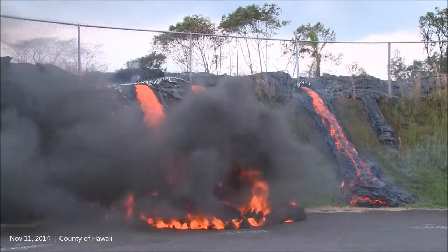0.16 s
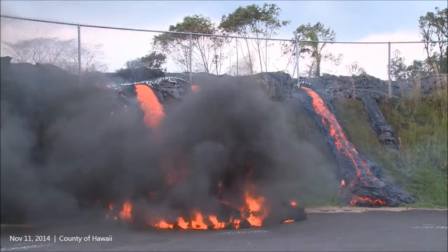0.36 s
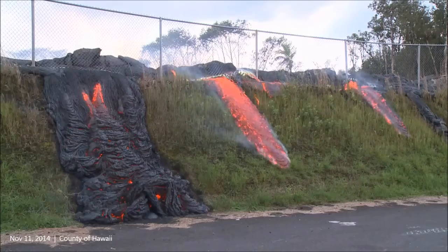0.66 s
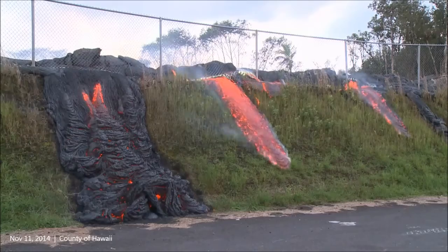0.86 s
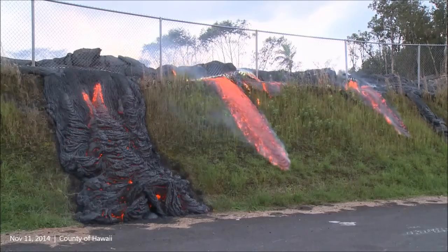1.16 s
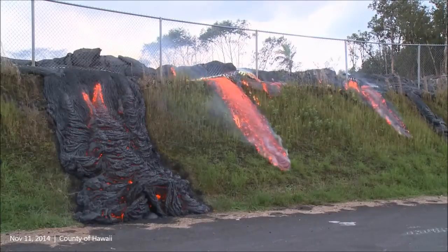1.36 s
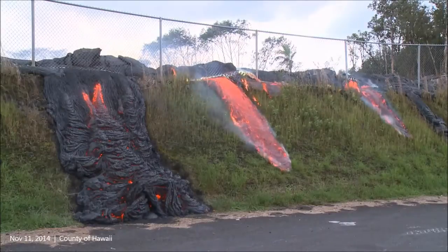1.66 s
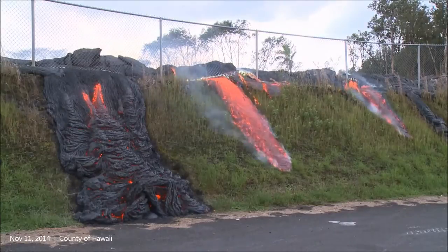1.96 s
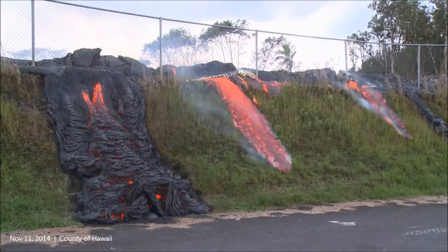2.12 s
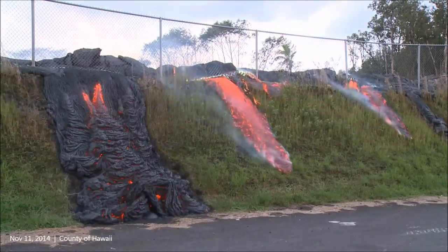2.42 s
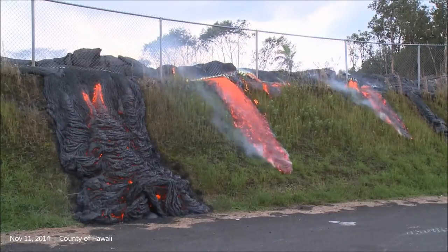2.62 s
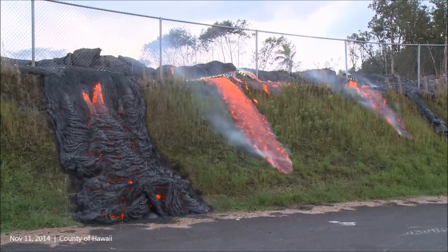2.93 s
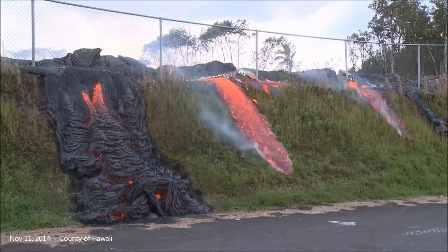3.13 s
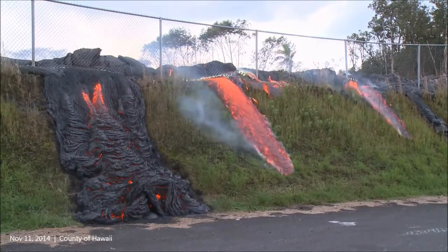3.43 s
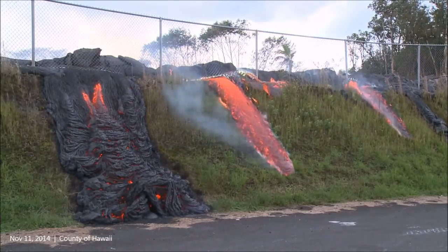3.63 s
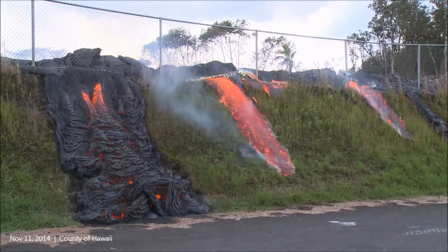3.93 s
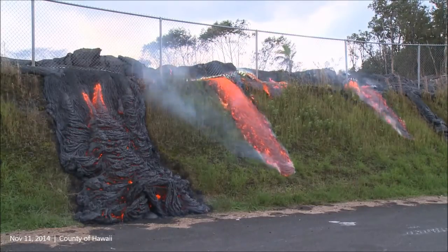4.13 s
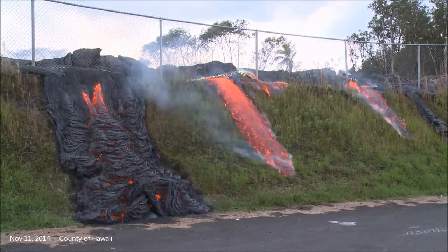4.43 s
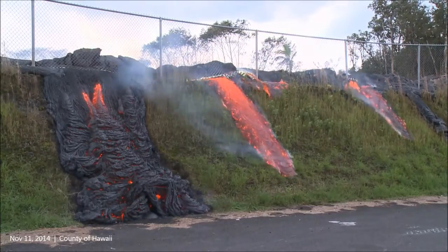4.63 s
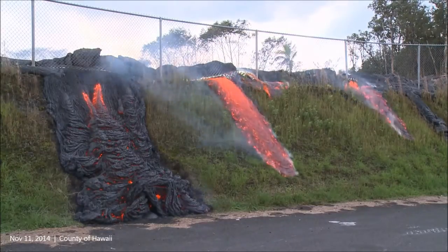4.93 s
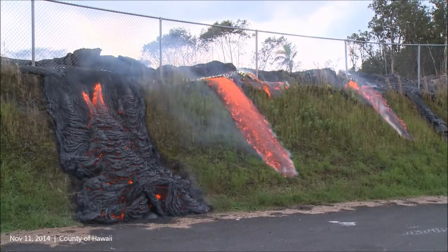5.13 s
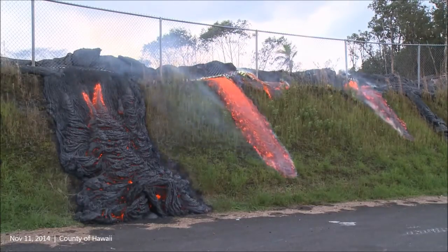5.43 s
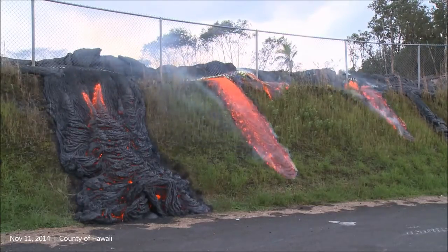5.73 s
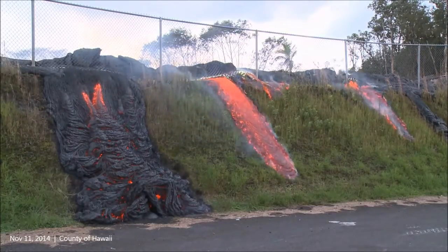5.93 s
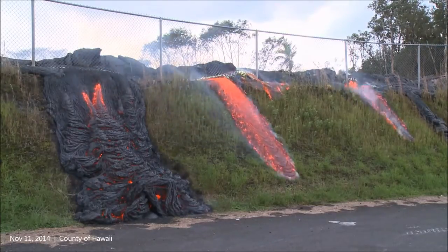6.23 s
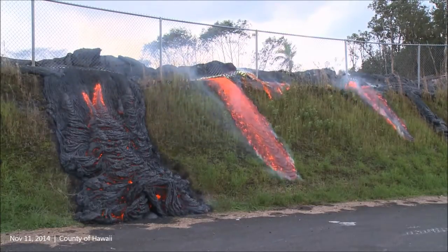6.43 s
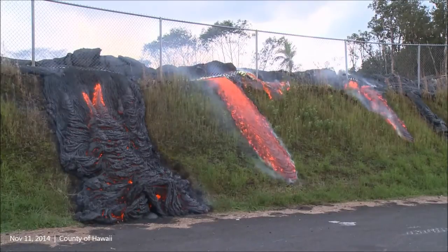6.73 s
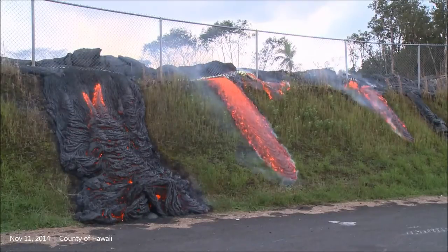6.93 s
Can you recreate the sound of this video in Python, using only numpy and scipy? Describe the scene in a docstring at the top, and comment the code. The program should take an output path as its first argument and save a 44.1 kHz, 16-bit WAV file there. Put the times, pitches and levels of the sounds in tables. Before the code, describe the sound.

Outdoors, a brief spatter of flaming asphalt breaks off in a tiny silence, giving way to grass burning under lava. Fine crackling and sizzling gently swell and ease while stalks snap and steam pockets pop at uneven intervals, two of them much louder. Later the crust settles with one dull thud. A faint rumble and a light breeze on the microphone lie underneath.

```python
"""Lava burning asphalt and grass

Half a second of flaming asphalt, a brief silence, then lava creeping down a grassy bank.
Steam pockets burst as short blasts, stalks snap, and countless tiny bursts merge into frying.
The ground doubles each pop, the bank returns a faint echo, and light wind rumbles on the microphone."""
import sys
import numpy as np
from scipy import signal
from scipy.fft import rfft, irfft
from scipy.io import wavfile
from scipy.ndimage import uniform_filter1d

SR = 44100
rng = np.random.default_rng(int(sys.argv[2]) if len(sys.argv) > 2 else 0)


def master(y):
    """Save y as 16-bit WAV."""
    cut = np.clip(np.atleast_2d(y).T, -1, 1)
    pcm = np.round(cut * 32767)  # scale
    wavfile.write(sys.argv[1], SR, pcm.astype(np.int16))


N = 311787
TIME_S = np.arange(N) / SR
ASPHALT_END_S, BANK_START_S = 0.505, 0.6055

# hiss of boiling sap and fine grit: freq_hz, density_db
SIZZLE_SPECTRUM = [(1500, 3), (3000, -25), (4500, 11), (7000, -6.5), (11000, -5.5), (16000, 5)]


def loud_pops():
    """Bursts of steam and stalks that stand out of the crackle; large pockets are low."""
    # start_s, blast_db, pitch_hz, snap_db
    events = [(0.0467, -48, 935, -52), (.129, -50, 1530, -58), (0.1843, -45, 1200, -81),
              (0.2482, -45.5, 480, -76), (.3309, -49.5, 2510, -43.5), (.607, -45.5, 1000, -53.5),
              (.6741, -49.5, 1030, -51.5), (0.822, -57, 1110, -45.5), (0.928, -45.5, 590, -48),
              (1.0078, -40, 1110, -73), (1.0477, -56, 1510, -43), (1.1347, -31.5, 1820, -46),
              (1.19, -53, 2820, -37), (1.2393, -49, 1940, -46), (1.2591, -47, 1610, -53),
              (1.2718, -43.5, 2730, -46), (1.3604, -49.5, 2340, -49.5), (1.4121, -50.5, 1520, -49.5),
              (1.6108, -23.5, 2270, -25.5), (1.628, -44.5, 2340, -50), (1.7386, -50, 1970, -42.5),
              (1.7901, -37, 2120, -44.5), (1.8527, -42.5, 646, -65), (1.979, -53, 2350, -48.5),
              (2.031, -47.5, 1150, -75), (2.1545, -55, 1940, -49), (2.161, -52, 2300, -49),
              (2.2824, -68, 1710, -45.5), (2.3082, -47.5, 1710, -53), (2.3283, -37, 2040, -42.5),
              (2.461, -47.5, 430, -69), (2.7121, -71, 1940, -52), (2.7396, -43, 560, -60),
              (2.7667, -49.5, 810, -59), (2.9137, -47.5, 1950, -52), (2.9387, -49.5, 710, -72),
              (3.1755, -33, 690, -67), (3.1882, -38.5, 890, -56), (3.2644, -71, 1420, -47.5),
              (3.3006, -59.5, 1100, -50), (3.5507, -50, 1410, -47), (3.597, -25.5, 1060, -38.5),
              (3.6287, -45.5, 1710, -65), (3.7215, -63, 2200, -50), (3.7805, -46.5, 1510, -51),
              (3.8068, -45, 2200, -35.5), (3.8323, -47, 2500, -40), (3.8356, -35, 2640, -45),
              (4.1269, -60, 2000, -44.5), (4.134, -49, 2650, -44), (4.2568, -67, 1710, -48.5),
              (4.3376, -46.5, 1310, -49), (4.388, -47, 2870, -34.5), (4.473, -61, 2200, -49),
              (4.4974, -47.5, 1260, -42.5), (4.5888, -41, 1360, -71), (4.667, -35, 760, -78),
              (4.7821, -42, 1880, -50), (4.9104, -48, 3010, -45.5), (4.9474, -47, 1940, -45),
              (4.9633, -47, 1950, -46), (4.979, -40.5, 2000, -39.5), (5.003, -47, 2070, -48),
              (5.0305, -50, 1180, -46), (5.0605, -67, 810, -43.5), (5.1104, -47.5, 2400, -49),
              (5.118, -53, 1180, -67), (5.2243, -63, 410, -47), (5.6648, -42.5, 1630, -38.5),
              (5.7129, -40.5, 1690, -40.5), (5.8041, -50.5, 2360, -55), (5.8364, -47.5, 1080, -58),
              (5.9002, -61, 2300, -48), (6.1124, -48, 1710, -56), (6.2425, -45.5, 420, -100),
              (6.329, -48, 2340, -59), (6.443, -48.5, 2070, -59), (6.7178, -45, 1140, -77),
              (6.8684, -50, 590, -73), (6.912, -47.5, 2430, -50), (7.016, -46.5, 1020, -69)]
    out = np.zeros(N)
    for start_s, blast_db, pitch_hz, snap_db in events:
        add(out, start_s, pop(blast_db, pitch_hz, snap_db))
    return out


def small_pops(blast_db=-55, snap_db=-57.5, blast_range_db=4, snap_range_db=7,
               low_hz=600, high_hz=2700, follow=0.99, count=110):
    """Weaker bursts at uneven intervals, mostly from small, high pockets, grow with the fire."""
    out = np.zeros(N)
    for k, (delay, size, strength, sharpness) in enumerate(rng.random((count, 4))):
        start_s = (k + 2 * delay) / count * N / SR
        pitch_hz = high_hz * (low_hz / high_hz) ** (size ** 2)
        fire_db = follow * burn_db(start_s)
        body_db = blast_db + fire_db + blast_range_db * (2 * strength - 1)
        front_db = snap_db + fire_db + snap_range_db * (2 * sharpness - 1)
        add(out, start_s, pop(body_db, pitch_hz, front_db))
    return out


def pop(blast_db, pitch_hz, snap_db, mirror_hz=1700, snap_hz=4400, top_hz=13000, dull_db=-33):
    """A blast with a snap on its front; heavy snaps are duller."""
    bounce = 0.85 / (1 + (pitch_hz / mirror_hz) ** 2 / 2)  # long waves mirror best: low pops ring hollow
    body = ground(burst(pitch_hz), bounce=bounce, scatter=0.3, linger=0.22)
    click = snap(snap_hz, top_hz / (1 + amp(snap_db - dull_db)))
    front = ground(click, bounce=0.81, scatter=1.0, linger=0.46)
    return amp(blast_db) * body + amp(snap_db) * front


def burst(pitch_hz, tight_hz=2300, ring_hz=2050, puff_hz=220):
    """Small pockets ring longer, large ones push a puff of air; a faint fixed ring adds a woody bite."""
    pulse = unit(blast(pitch_hz, q=0.44 + (pitch_hz / tight_hz) ** 2))
    ring = 0.033 * unit(blast(ring_hz, q=2))
    puff = 0.23 / (1 + (pitch_hz / 1000) ** 2) * unit(blast(puff_hz, q=0.3))
    return pulse + ring + puff


def blast(pitch_hz, q, size=1024):
    """Pressure pulse of a bursting pocket: one swing and a weak rebound."""
    s = 1j * np.fft.rfftfreq(size, 1 / SR) / pitch_hz
    return -irfft(s / (1 + s / q + s * s) / (1 + s / 2))


def snap(corner_hz, top_hz=15000, size=1024):
    """Bright click of a breaking fibre, softened a little by the air."""
    freq_hz = np.fft.rfftfreq(size, 1 / SR)
    s = 1j * freq_hz / corner_hz
    return irfft((s / (1 + s)) ** 2 / (1 + 1j * freq_hz / top_hz))


def frying(level_db=-57, fade_s=0.0013, steady=0.17, follow=0.46):
    """Distant bursts, each a quickly fading puff, merge into a wash that swells with the fire."""
    # freq_hz, density_db
    spectrum = [(250, -7.5), (450, -6), (700, 2.5), (1300, 4.5), (1900, 4.5), (2400, 4), (3000, 0),
                (3600, -3), (4500, -12), (7000, -8.5), (11000, -13), (16000, -27)]
    bursts = clicks(per_s=420, spread_db=0.5, max_spreads=9.9)
    power = signal.lfilter([1], [1, -np.exp(-1 / (fade_s * SR))], bursts ** 2)
    envelope = unit(np.sqrt(steady + power / power.mean()))
    return noise(spectrum) * envelope * amp(level_db + follow * burn_db(TIME_S))


def crackle(level_db=-61.5, hiss_db=-67, per_s=340, clump_db=3, kinds=16):
    """Fine stalks of varied brightness snap in clumps over a hiss of boiling sap."""
    snaps = np.zeros(N)
    for corner_hz in np.geomspace(1500, 9000, kinds):
        tick = ground(snap(corner_hz), bounce=0.4, scatter=1.6, linger=0.75, scatter_s=0.001)
        snaps += signal.oaconvolve(clicks(per_s / kinds, spread_db=4), tick)[:N]
    stalks = amp(level_db) * unit(snaps * amp(clump_db * drift(rate_hz=27)))
    sap = amp(hiss_db) * noise(SIZZLE_SPECTRUM)
    return (stalks + sap) * amp(burn_db(TIME_S))


def simmer(level_db=-59.5, per_s=260, kinds=24):
    """Small steam pockets of varied size burst all over the flow."""
    out = np.zeros(N)
    for pitch_hz in np.geomspace(480, 2700, kinds):
        pocket = ground(blast(pitch_hz, q=1.75), bounce=0.38, scatter=1.0, linger=1.0)
        out += signal.oaconvolve(clicks(per_s / kinds, spread_db=4), pocket)[:N]
    return amp(level_db) * unit(out)


def burn_db(time_s):
    """How hard the grass burns, relative to its usual strength."""
    # time_s, level_db
    strength = [(.6, 5), (1.1, 4), (1.5, 0), (1.7, 4), (2.3, 2), (2.55, -1.5), (2.85, 2.5), (3.05, -1.5),
                (3.5, -2), (3.75, 5), (4.03, 1), (4.7, 1.5), (4.96, 7.5), (5.35, -1), (5.6, 1.5), (6.1, -2),
                (6.6, -3.5), (7.05, 0.5)]
    return np.interp(time_s, *np.transpose(strength))


def asphalt(level_db=-57.5):
    """Burning tar spits densely."""
    # freq_hz, density_db
    spectrum = [(200, 3.5), (550, -4), (950, 1), (1400, 2), (2700, 0), (4500, -9), (7000, -13),
                (12000, -22.5), (16000, -24)]
    spits = clicks(per_s=4000, spread_db=5.5, max_spreads=3.3) * rng.choice([-1, 1], N)
    return amp(level_db) * unit(colour(spits, spectrum))


def thuds():
    """A slab of crust settles with one slow, heavy push of air."""
    # start_s, level_db, pitch_hz
    events = [(5.4318, -32.5, 137)]
    out = np.zeros(N)
    for start_s, level_db, pitch_hz in events:
        push = ground(blast(pitch_hz, q=0.49), bounce=0, scatter=0.16, linger=0.3)
        add(out, start_s, amp(level_db) * push)
    return out


def grit_sprays(rise_s=0.036):
    """Grit flung by the loudest bursts patters in a brief, bright sizzle."""
    # start_s, level_db
    events = [(1.616, -56), (3.607, -51)]
    t = np.arange(SR // 3) / SR
    envelope = np.zeros(N)
    for start_s, level_db in events:
        add(envelope, start_s, amp(level_db) * t / rise_s * np.exp(1 - t / rise_s))
    return envelope * unit(colour(clicks(per_s=2500, spread_db=3), SIZZLE_SPECTRUM))


def steam_squeaks(waver=0.027):
    """A thin jet of steam whistles through a crack on a rough, unsteady pitch."""
    # start_s, length_s, pitch_hz, level_db
    events = [(1.729, 0.048, 4740, -59)]
    out = np.zeros(N)
    wander = 1 + waver * drift(rate_hz=700)
    for start_s, length_s, pitch_hz, level_db in events:
        cycles = np.cumsum(pitch_hz * wander[:round(length_s * SR)]) / SR
        add(out, start_s, amp(level_db) * np.sin(2 * np.pi * cycles) * np.hanning(len(cycles)))
    return out


def ground(pulse, bounce, scatter, linger,
           delay_s=0.001752, scatter_s=0.00041, linger_s=0.0048, rms_window_s=0.0082):
    """A pulse, its ground bounce and its scatter in near and far grass; rms 1 over rms_window_s."""
    t = np.arange(len(pulse)) / SR
    near = rng.standard_normal(len(t)) * np.exp(-t / scatter_s)
    far = rng.standard_normal(len(t)) * np.exp(-t / linger_s)
    path = scatter * near / np.linalg.norm(near) + linger * far / np.linalg.norm(far)
    path[0] = 1  # direct sound
    reflection = bounce * np.array([1, 10, 1]) / 12  # loses a little treble
    add(path, delay_s * rng.uniform(0.75, 1.05), reflection)
    heard = signal.fftconvolve(pulse, path)[:len(t)]
    return heard / np.linalg.norm(heard) * np.sqrt(rms_window_s * SR)


def bank(fire, echo_db=-16, onset_s=0.0041, rise_s=0.014):
    """Bank, fence and trees scatter a little sound back; fire and echo arrive with one colour."""
    # freq_hz, t60_s
    decay = [(200, 0.082), (800, 0.39), (2500, 0.4), (6000, 0.2), (14000, 1)]
    # freq_hz, gain_db
    response = [(750, -2.5), (1100, -6), (1500, -7), (2300, -2), (3100, -7), (3600, -5), (4300, -14),
                (4600, -11), (4950, -17.5), (5400, -10), (6500, -8), (7200, -10), (8500, -6), (11000, -5),
                (12200, -9), (13000, -8.5), (14200, -14.5), (15300, -5), (16200, -17.5)]
    freq_hz, frame_s, bands = signal.stft(rng.standard_normal(SR // 2), SR, nperseg=256)
    fade = np.exp(-np.log(1000) * frame_s / log_interp(decay, freq_hz)[:, None])
    _, tail = signal.istft(bands * fade, SR, nperseg=256)
    t = np.arange(len(tail)) / SR
    tail *= 1 - np.exp(-np.maximum(t - onset_s, 0) / rise_s)
    echo = signal.fftconvolve(fire, tail / np.linalg.norm(tail))[:N]
    return colour(fire + amp(echo_db) * echo, response)


def wind(breeze_db=-58, lull_db=1, ramp_s=0.031):
    """A light breeze and a few gusts buffet the microphone."""
    # start_s, length_s, level_db
    gusts = [(.6, 0.4, -53.5), (1.162, 0.36, -59.5), (1.336, 0.077, -39.5), (2.584, 0.11, -55),
             (4.25, 0.48, -64), (6.07, 0.16, -58), (6.514, 0.092, -54)]
    # freq_hz, density_db
    spectrum = [(10, 1), (30, 1.5), (55, -0.5), (100, -6.5), (170, -25), (400, -51), (1500, -65)]
    envelope = amp(breeze_db + lull_db * drift(rate_hz=4.4))
    for start_s, length_s, level_db in gusts:
        t = np.arange(0, length_s, 1 / SR)
        trapezoid = np.minimum(np.minimum(t, length_s - t) / ramp_s, 1)
        add(envelope, start_s, amp(level_db) * trapezoid)
    return envelope * noise(spectrum)


def rumble(level_db=-57, road_db=-5, swell_db=1):
    """Faint outdoor rumble, weaker by the road."""
    # freq_hz, density_db
    spectrum = [(20, -11.5), (50, -3), (85, 1), (160, -2), (230, -9.5), (330, -12), (600, -21.5),
                (1500, -57), (5000, -50)]
    by_road = TIME_S < ASPHALT_END_S
    return noise(spectrum) * amp(level_db + road_db * by_road + swell_db * drift(rate_hz=2.5))


def amp(db):
    """Decibels to gain."""
    return 10 ** (np.asarray(db) / 20)


def unit(x):
    """Scales to rms 1."""
    return x / np.sqrt(np.mean(x ** 2) + 1e-20)


def log_interp(points, freq_hz):
    """Joins points by straight lines on a log-frequency axis."""
    knots_hz, values = np.transpose(points)
    return np.interp(np.log(freq_hz + 1), np.log(knots_hz), values)


def colour(x, spectrum, size=4096):
    """Minimum-phase filter, so clicks keep sharp fronts."""
    freq_hz = abs(np.fft.fftfreq(size, 1 / SR))
    log_gain = np.log(amp(log_interp(spectrum, freq_hz)))
    taps = np.fft.ifft(np.exp(np.conj(signal.hilbert(log_gain)))).real
    return signal.oaconvolve(x, taps[:size // 2])[:len(x)]


def noise(spectrum):
    """Steady shaped noise, rms 1."""
    gain = amp(log_interp(spectrum, np.fft.rfftfreq(N, 1 / SR)))
    return unit(irfft(rfft(rng.standard_normal(N)) * gain, N))


def drift(rate_hz):
    """Smooth random wander, rms 1."""
    lowpass = np.exp(-(np.fft.rfftfreq(N, 1 / SR) / rate_hz) ** 2)
    return unit(irfft(rfft(rng.standard_normal(N)) * lowpass, N))


def clicks(per_s, spread_db, max_spreads=4.25):
    """Random impulses: most small, a few large."""
    hits = rng.random(N) < per_s / SR
    return hits * amp(spread_db * np.minimum(rng.exponential(1, N), max_spreads))


def add(mix, start_s, sound):
    """Mixes a sound in place."""
    part = mix[max(round(start_s * SR), 0):][:len(sound)]
    part += sound[:len(part)]


def scene():
    """Burning asphalt, then the burning bank; pops, wind and rumble run through both. Mono."""
    on_bank = TIME_S > ASPHALT_END_S
    bursts = loud_pops() + small_pops() + thuds() + grit_sprays()
    grass = on_bank * (crackle() + simmer() + frying())
    return (bank(bursts + grass) + steam_squeaks() + ~on_bank * asphalt() + wind() + rumble())[None]


def record(dry, cutoff_hz=16300):
    """Silence between the two places, then a band limit."""
    audible = (TIME_S < ASPHALT_END_S) | (TIME_S > BANK_START_S)
    gate = uniform_filter1d(audible.astype(float), size=64)
    lowpass = signal.firwin(255, cutoff_hz, window=("kaiser", 9), fs=SR)
    return signal.oaconvolve(dry * gate, lowpass[None], "same")


dry = scene()
out = record(dry)
master(out)
```